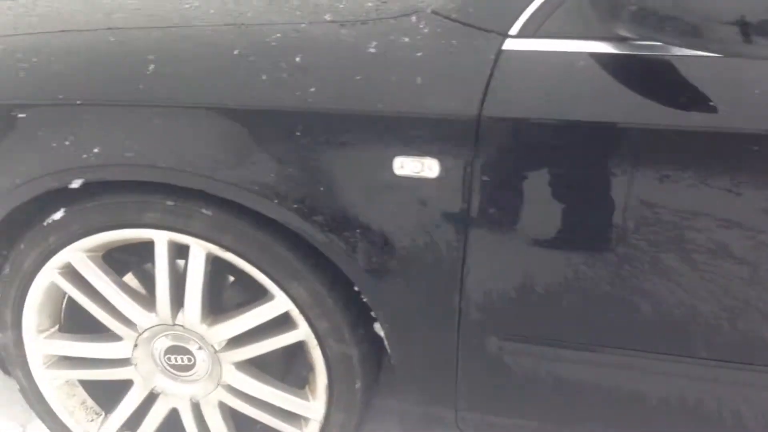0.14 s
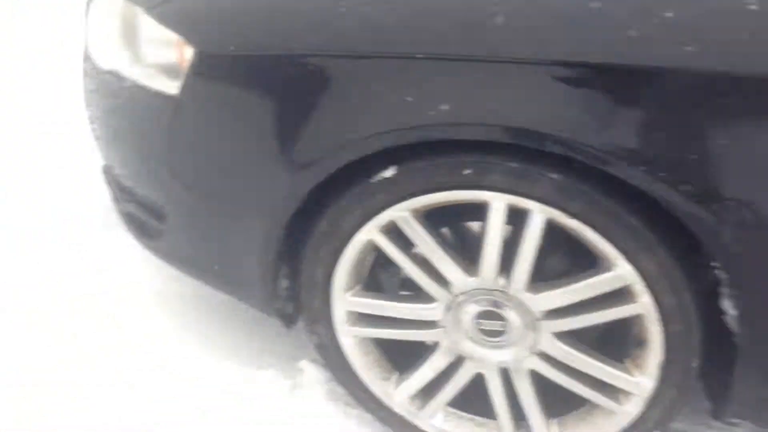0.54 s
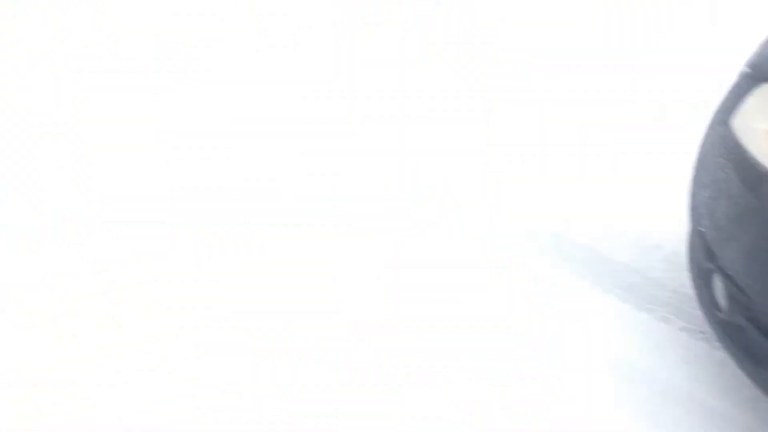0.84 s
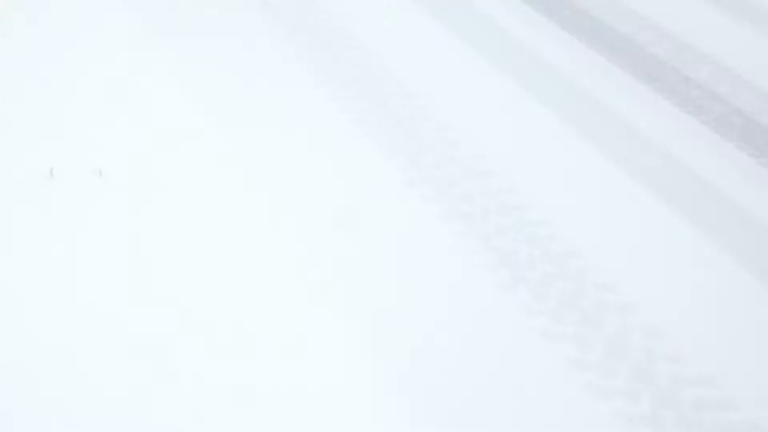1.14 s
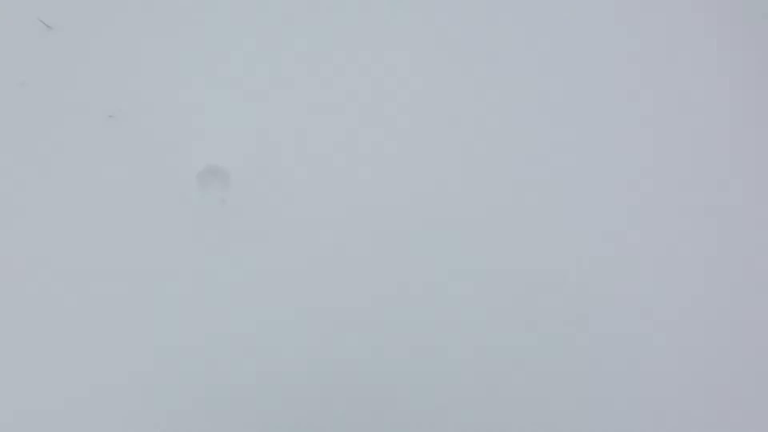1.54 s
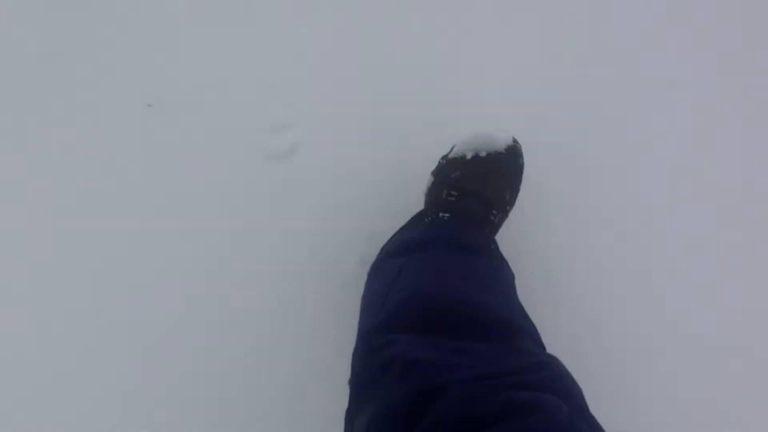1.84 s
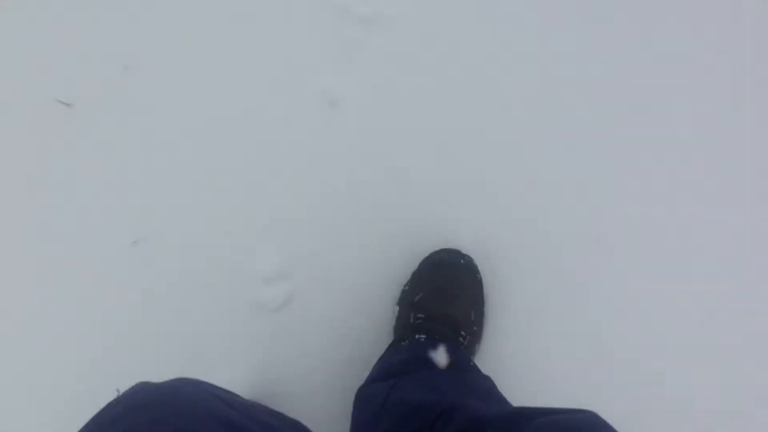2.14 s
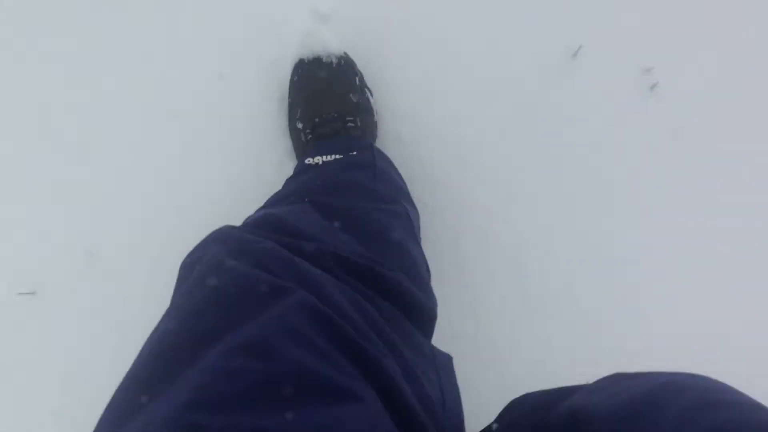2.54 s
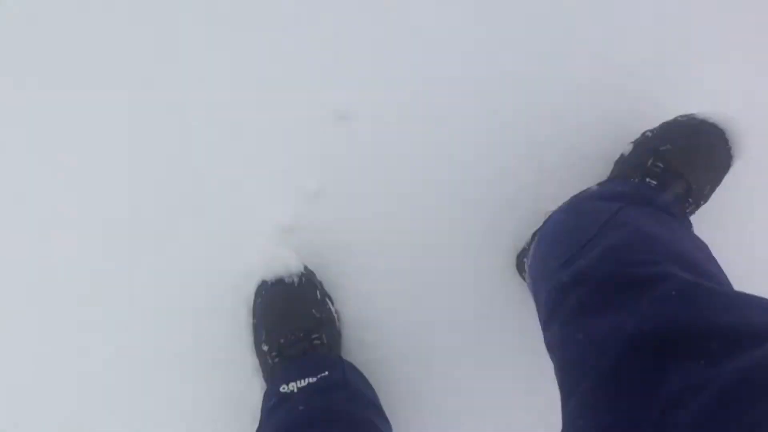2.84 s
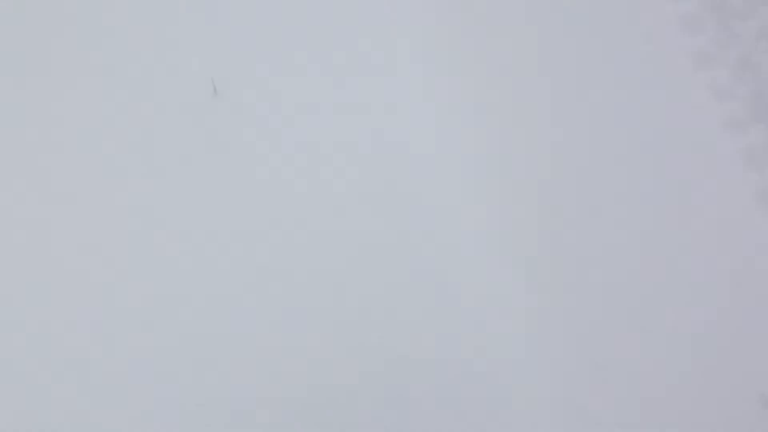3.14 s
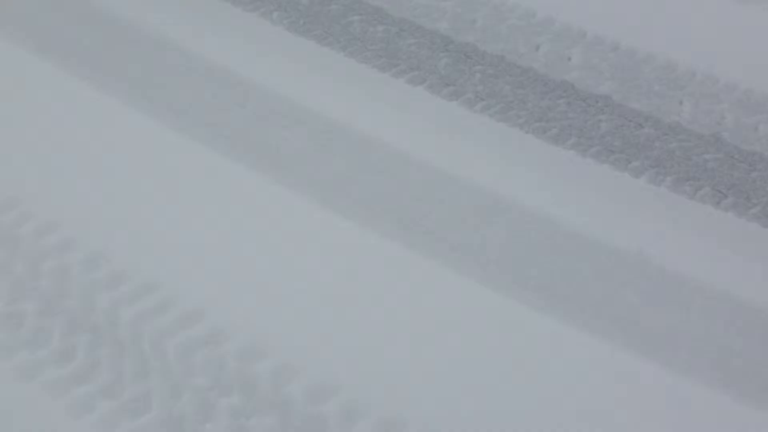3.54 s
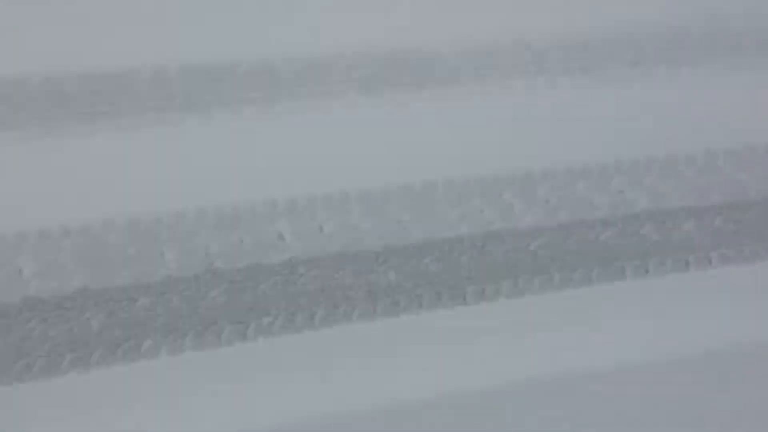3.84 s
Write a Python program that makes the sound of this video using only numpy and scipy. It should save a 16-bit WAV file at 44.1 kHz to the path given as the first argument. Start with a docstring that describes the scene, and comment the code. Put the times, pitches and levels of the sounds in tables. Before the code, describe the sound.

Boots crunching in snow, hand knocks bumping the microphone, and a car engine idling quietly behind.

```python
"""A snowy place in the open air: someone walks away from an idling car and turns back, camera in hand.
Soft snow collapses under the boots in short dull pulses, each with a trickle of smaller ones;
trouser legs and powder swish as swells of filtered noise. Low thumps, mostly knocks of the hand,
are low pulses over buffeting noise; two higher-pitched knocks share the snow's pulses.
The engine is wavering noise with decaying ticks and thin whistling tones."""
import sys
import numpy as np
from scipy import signal
from scipy.fft import rfft, irfft
from scipy.io import wavfile
from scipy.ndimage import uniform_filter1d

SR = 44100
rng = np.random.default_rng(int(sys.argv[2]) if len(sys.argv) > 2 else 0)


def digitize_waveform(pressure):
    """Quantize a signal to 16-bit integers and store it at the path in sys.argv[1].

    Rows of a 2-D input are taken as channels; values are limited to [-1, 1].
    """
    field = np.atleast_2d(pressure).T
    bounded = np.clip(field, -1, 1)
    quanta = np.round(bounded * 32767).astype(np.int16)
    wavfile.write(sys.argv[1], SR, quanta)


N = 176400
TIME = np.arange(N) / SR  # s


def amp(db):
    """Logarithmic level: decibels to a pressure gain."""
    return 10 ** (np.asarray(db) / 20)


def unit(x):
    """Normalisation: scales a signal to rms 1."""
    return x / np.sqrt(np.mean(x ** 2) + 1e-20)


def level(points):
    """Envelope: gain along a curve of (time_s, level_db), straight in decibels."""
    return amp(np.interp(TIME, *np.transpose(points)))


def drift(rate_hz):
    """Low-passed random fluctuation of rms 1, with a Gaussian roll-off."""
    hz = np.fft.rfftfreq(N, 1 / SR)
    spectrum = rfft(rng.standard_normal(N)) * np.exp(-(hz / rate_hz) ** 2)
    return unit(irfft(spectrum, N))


def noise(tone, tilt_db=0):
    """Spectral shaping: white noise weighted by (frequency_hz, level_db) and a tilt per octave; rms 1."""
    octave = np.log2(np.fft.rfftfreq(N, 1 / SR) + 1)
    hz, db = np.transpose(tone)
    weight_db = np.interp(octave, np.log2(hz), db) + tilt_db * octave
    return unit(irfft(rfft(rng.standard_normal(N)) * amp(weight_db), N))


def patchy(x, depth_db):
    """Local modulation: narrow stretches of the spectrum swell and sink on their own."""
    bands = signal.stft(x, nperseg=1024, noverlap=768)[2]
    field = rng.standard_normal(bands.shape)
    field = uniform_filter1d(field, size=4, axis=0)  # smoothed across frequency
    field = uniform_filter1d(field, size=7, axis=1)  # smoothed across time
    shaped = bands * amp(depth_db * unit(field))
    return unit(signal.istft(shaped, nperseg=1024, noverlap=768)[1][:N])


def add_pulse(mix, s, gain, hz, smooth, skew):
    """Transient: adds one push and rebound of pressure, about one cycle long, centred on s."""
    centre, reach = int(s * SR), SR // 40
    span = slice(max(centre - reach, 0), min(centre + reach, N))
    pulse = (1 - 2j * np.pi * hz * (TIME[span] - s) / smooth) ** -smooth
    mix[span] += gain * (pulse * np.exp(1j * skew)).real


# Short dull pulses: snow giving way under a boot, and two higher-pitched knocks near 3.23 s.
# start_s [s, centre of the pulse], level_db [dB, its envelope peak], pitch_hz [Hz],
# crumbling [0-1, strength of the trickle that follows]
CRUNCHES = [(.055, -38.5, 540, 0.6), (0.8118, -33.5, 450, 0.68), (.9476, -38, 647, 1),
            (1.0901, -36.5, 706, 0.3), (1.1266, -29.5, 525, 0.5), (1.1895, -35.5, 413, 0.04),
            (1.3317, -28, 610, 1), (1.348, -39, 800, .6), (1.4273, -30.5, 426, 0.26),
            (1.5986, -28.5, 520, 0.5), (1.68, -36, 1500, 0.1), (1.7093, -25.5, 477, 0.53),
            (1.9295, -24, 560, 0.35), (1.9959, -24.5, 637, 0.08), (2.0323, -38.5, 553, 1),
            (2.1538, -29.5, 760, 0.66), (2.1607, -37, 443, 0.06), (2.3451, -23.5, 610, 0.34),
            (2.352, -35, 970, .3), (2.4401, -25, 393, 0.35), (2.5593, -28.5, 480, 0.4),
            (2.5889, -31.5, 447, 0.5), (2.878, -42.5, 850, 0), (2.955, -29.5, 480, 0.48),
            (2.9833, -31, 493, 0.57), (2.9919, -32, 427, 0.17), (3.0271, -29.5, 650, 0.86),
            (3.0906, -32.5, 450, 0.16), (3.183, -31, 330, 0.2), (3.2284, -23, 477, 0.37),
            (3.2379, -22, 565, 0.7), (3.3984, -30, 560, 0), (3.438, -39, 674, 0.7), (3.5597, -31.5, 890, 0),
            (3.9709, -37, 543, 0.83)]
SNAP_ORDER, SNAP_SKEW = 4.1, 0.73  # smoothness of one pulse; its lopsidedness [rad]
CRUST_HZ, CRUST_DB, CRUST_ORDER = 1330, -15, 6  # sharper snap of the crust; dB is its most
SETTLE_RATIO, SETTLE_DB = 0.6, -9  # pitch and level of the settling, relative to the main pulse
CRUMBLE_PER_S, CRUMBLE_S = 290, 0.011  # mean rate of the trickle; its decay time


def snow_and_two_knocks():
    """Brittle collapse: a snap, a settling a cycle later and a dying trickle; two knocks sound alike."""
    out = np.zeros(N)
    for s, db, hz, crumble in CRUNCHES:
        add_pulse(out, s, -amp(db), hz, SNAP_ORDER, SNAP_SKEW)
        crust = min(2 * hz / CRUST_HZ, 1) ** 2  # stronger in higher pulses
        add_pulse(out, s, amp(db + CRUST_DB) * crust, CRUST_HZ, CRUST_ORDER, -np.pi / 2)
        add_pulse(out, s + 1 / hz, -amp(db + SETTLE_DB), hz * SETTLE_RATIO, CRUST_ORDER, 0)
        gaps, sizes, pitches, skews = rng.random(size=(4, 24))
        delays = np.cumsum(.5 + gaps) / CRUMBLE_PER_S
        for delay, size, pitch, skew in zip(delays, sizes, pitches, skews):
            gain = amp(db) * crumble * (.5 + size) * np.exp(-delay / CRUMBLE_S)
            grain_hz = hz * 2 ** (pitch - .5)  # within half an octave either way
            add_pulse(out, s + delay, gain, grain_hz, SNAP_ORDER, 2 * np.pi * skew)
    return out


def creaks(peak_db=-45, spread_db=2, pitch_hz=540, trail_s=.03, lag_s=0.038):
    """Stick-slip: two faint slips of snow, scattered about a short lag after each pulse above."""
    out = np.zeros(N)
    for s, *_ in CRUNCHES:
        for when, size, pitch, skew in rng.standard_normal(size=(2, 4)):
            start_s = abs(s + lag_s + trail_s * when)
            slip_hz = pitch_hz * 2 ** (.5 * pitch)
            add_pulse(out, start_s, amp(peak_db + spread_db * size), slip_hz, SNAP_ORDER, np.pi * skew)
    return out


SOLE_HZ, SOLE_Q, SOLE_DB = 568, 9.8, -9.5


def underfoot(x):
    """Resonance: the snow packed under the sole adds a short hollow ring."""
    ring = signal.lfilter(*signal.iirpeak(SOLE_HZ, SOLE_Q, fs=SR), x)
    return x + amp(SOLE_DB) * ring


# Trouser legs and kicked powder: start_s [s, loudest moment], half_length_s [s, before the rise and
# fall factors], level_db [dB, rms at the loudest before the grain], brightness [dB per octave]
SWISHES = [(1.79, 0.036, -56, -1), (2.245, 0.099, -55.5, -3), (2.43, 0.053, -54.5, -3),
           (2.54, 0.068, -53, -3.5), (2.674, 0.033, -43, -4.5), (3.116, 0.028, -61, -2.5),
           (3.561, 0.0069, -50.5, 3), (3.586, 0.013, -54, 8), (3.82, 0.055, -56.5, -2.5)]
# Spectrum of a swish before its brightness tilt: frequency_hz [Hz], level_db [dB]
SWISH_TONE = [(300, -8.5), (1500, -21), (3000, 0), (4500, 0.5), (7500, -1.5), (11000, -6), (15500, -14)]
SWISH_RISE, SWISH_FALL = 1.15, 0.8  # factors on half length: it builds more slowly than it stops
SWISH_GRAIN_DB = 1.5  # rms depth of the grain


def swishes():
    """Friction noise: grainy hiss swells as a leg swings through and stops as it lands."""
    out = np.zeros(N)
    for s, half_s, db, tilt in SWISHES:
        reach = half_s * np.where(TIME < s, SWISH_RISE, SWISH_FALL)
        swell = np.exp(-.5 * ((TIME - s) / reach) ** 2)
        out += amp(db) * swell * noise(SWISH_TONE, tilt_db=tilt)
    return out * amp(SWISH_GRAIN_DB * drift(rate_hz=52))


# Low thumps: knocks of the hand on the camera, and the dull weight under two footfalls
# (near 1.71 and 2.36 s). start_s [s, centre], level_db [dB, envelope peak], pitch_hz [Hz]
THUMPS = [(.192, -17.5, 132), (0.235, -32, 134), (.288, -30.5, 111), (.402, -29.5, 120),
          (0.475, -23.5, 167), (.495, -33.5, 238), (0.5192, -19, 165), (.537, -27, 121), (0.55, -31, 178),
          (0.562, -20.5, 117), (.607, -23, 137), (0.6222, -24, 163), (0.695, -26.5, 211),
          (.713, -26.5, 148), (1.179, -32, 125), (1.625, -31, 175), (1.713, -32, 174), (2.357, -34, 183),
          (3.222, -14.5, 240), (3.2416, -15, 335), (3.2603, -6.5, 199), (3.283, -21.5, 137),
          (3.333, -27, 148), (3.372, -31.5, 180), (3.3999, -18, 107), (3.4075, -11.5, 246),
          (3.4168, -15.5, 200), (3.446, -29, 143), (3.995, -31, 110)]
THUMP_ORDER, THUMP_SKEW = 4.23, 0.1  # smoothness at the hard-thump level; lopsidedness [rad]
HARD_THUMP_DB, SOFT_ORDER_PER_DB = -6, 0.17  # softer thumps are rounder and ring a little longer
THUMP_EDGE_RATIO, THUMP_EDGE_DB = 2.6, -11  # pitch of the edge; its level in a hard thump, both relative
# Low buffeting of air and hand at the microphone: time_s [s], level_db [dB, rms]
BUFFET = [(0, -76), (.1, -44.5), (.3, -50.5), (.44, -53), (.5, -32), (.65, -33.5), (.72, -37.5), (.78, -67),
          (1.08, -54), (1.15, -48), (1.23, -60), (1.76, -52.5), (2.05, -56), (3.16, -58), (3.22, -33),
          (3.3, -45.5), (3.43, -39), (3.49, -65), (4, -89)]
# Spectrum of the buffeting: frequency_hz [Hz], level_db [dB]
BUFFET_TONE = [(20, -10), (45, 1), (80, 4), (170, -1), (270, -6.5), (400, -15), (700, -25), (2500, -73)]
BUFFET_LUMP_DB, BUFFET_LUMP_HZ = 5, 35  # largest swing either way; rate


def thumps_and_buffeting():
    """Impact and turbulence: dull thumps, sharper-edged when harder, over lumpy low buffeting."""
    lumps = amp(BUFFET_LUMP_DB * np.tanh(drift(rate_hz=BUFFET_LUMP_HZ)))
    out = level(BUFFET) * unit(noise(BUFFET_TONE) * lumps)
    for s, db, hz in THUMPS:
        softer_db = HARD_THUMP_DB - db
        order = THUMP_ORDER + SOFT_ORDER_PER_DB * softer_db
        add_pulse(out, s, amp(db), hz, order, THUMP_SKEW - np.pi / 2)
        edge_gain = amp(db + THUMP_EDGE_DB - softer_db)
        add_pulse(out, s + .17 / hz, edge_gain, hz * THUMP_EDGE_RATIO, SNAP_ORDER, 0)
    return out


# Idling engine as the walker moves off and turns back: time_s [s], level_db [dB]
ENGINE = [(0, -50), (.5, -48), (.8, -48.5), (1.05, -49.5), (1.35, -52), (1.6, -51), (2, -53.5), (2.5, -53),
          (2.82, -56), (3.1, -52.5), (3.45, -55.5), (3.65, -49.5), (3.8, -52.5), (4, -49.5)]
# Spectrum of the rumble and fan rush: frequency_hz [Hz], level_db [dB]
ENGINE_TONE = [(20, -25), (40, 10), (65, 10), (120, 1), (200, 0), (350, 2.5), (450, 1), (550, 1), (800, -2),
               (1200, -6.5), (1480, -5), (2200, -5.5), (2700, -10), (4300, -10.5), (6000, -14.5),
               (10000, -23), (12500, -30.5), (15500, -32)]
# Spectrum of the firing ticks: frequency_hz [Hz], level_db [dB]
TICK_TONE = [(500, 0), (2000, 6), (4500, -5.5), (8000, -2), (11000, -7.5), (15500, -23)]
# Thin whistles of the belt drive: pitch_hz [Hz, mean], level_db [dB, rms at full reach]
WHINES = [(2950, -71.5), (2450, -78)]
# Reach of the whistles, strongest beside the bonnet: time_s [s], level_db [dB]
WHINE_REACH = [(0, -12), (.45, 0), (1.1, 0), (1.2, -15)]
FIRING_HZ, FIRST_FIRING_S = 27.77, .05  # mean rate; nominal time of one firing
TICK_DB, TICK_S, TICK_UNEVEN = -13.5, 0.007, 0.3  # relative level; decay time; strong-weak alternation
PATCH_DB, FLUTTER_DB = 2, 1.44  # rms depth: the rush wavers in patches and as a whole


def engine():
    """Periodic excitation: a tick at each firing, strong and weak in turn, with rush and whistles."""
    firing_rate = FIRING_HZ * (1 + .001 * drift(rate_hz=2.2))
    firings = np.cumsum(firing_rate) / SR - FIRING_HZ * FIRST_FIRING_S
    rush = patchy(noise(ENGINE_TONE), depth_db=PATCH_DB)
    rush = rush * amp(FLUTTER_DB * drift(rate_hz=48))
    decay = np.exp(-(firings % 1) / FIRING_HZ / TICK_S)
    beat = decay * (1 + TICK_UNEVEN * np.cos(np.pi * np.floor(firings)))
    ticks = unit(beat * amp(drift(rate_hz=7.5)) * noise(TICK_TONE))
    whine = np.zeros(N)
    for hz, db in WHINES:
        cycles = np.cumsum(hz * (1 + 0.0027 * drift(rate_hz=18))) / SR
        whine += amp(db) * np.sqrt(2) * np.sin(2 * np.pi * cycles)
    return level(ENGINE) * (rush + amp(TICK_DB) * ticks) + level(WHINE_REACH) * whine


# Spectrum of the faint outdoor hiss: frequency_hz [Hz], level_db [dB]
AIR_TONE = [(100, -5), (1500, -8), (15500, -15)]
AIR_DB = -63  # rms


def air():
    """Stationary noise: a faint steady outdoor hiss."""
    return amp(AIR_DB) * noise(AIR_TONE)


def scene():
    """Superposition in the free field: the sources add over open snow, with no echo."""
    pulses = underfoot(snow_and_two_knocks() + creaks())
    return (pulses + swishes() + thumps_and_buffeting() + engine() + air())[None]


LOW_CUT_HZ, EDGE_HZ = 44, 15350


def record(dry):
    """Band limiting: the microphone loses the deepest bass, the recorder the highest treble."""
    hz = np.fft.rfftfreq(2 * N, 1 / SR)
    bass_loss = hz ** 3 / np.hypot(hz ** 3, LOW_CUT_HZ ** 3)
    thinned = irfft(rfft(dry, 2 * N) * bass_loss)[:, :N]
    low_pass = signal.firwin(1023, EDGE_HZ, window=("kaiser", 9), fs=SR)
    return signal.oaconvolve(thinned, low_pass[None], "same")


dry = scene()
out = record(dry)
digitize_waveform(out)
```